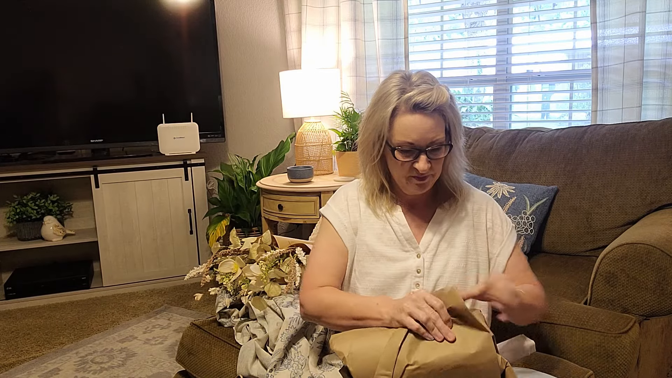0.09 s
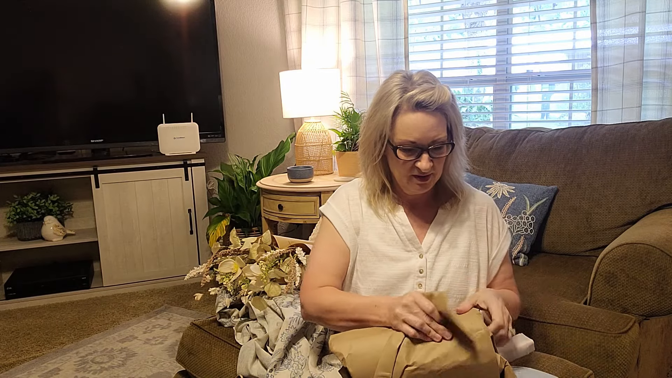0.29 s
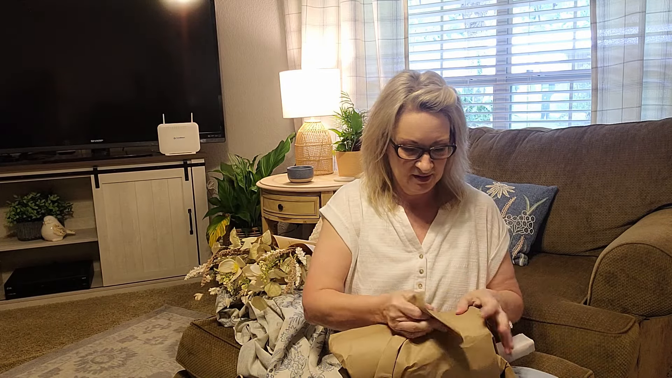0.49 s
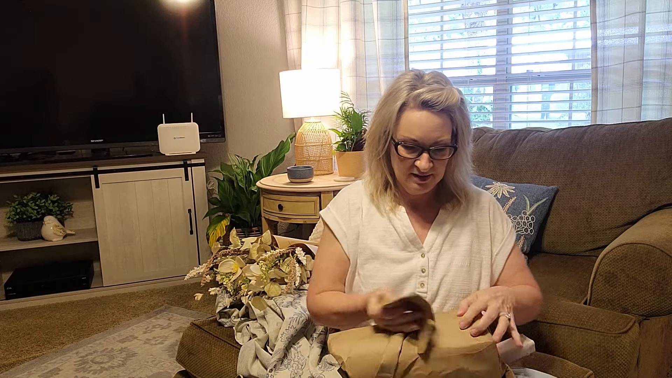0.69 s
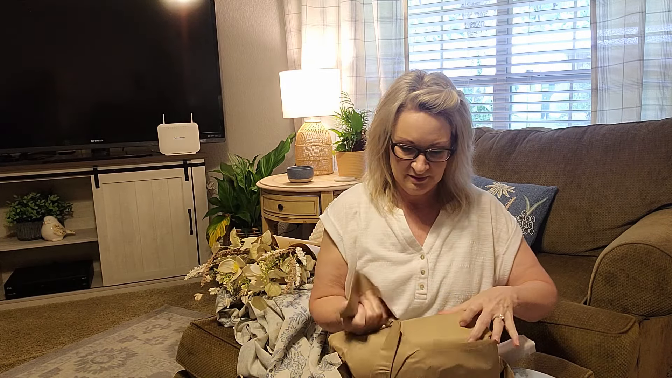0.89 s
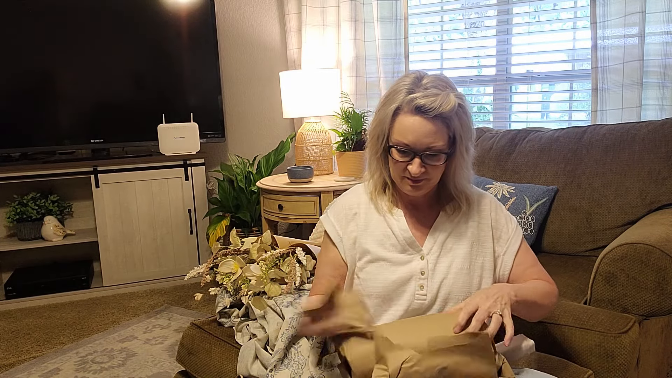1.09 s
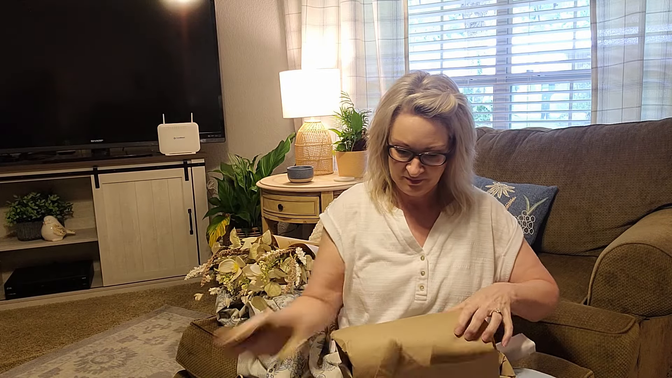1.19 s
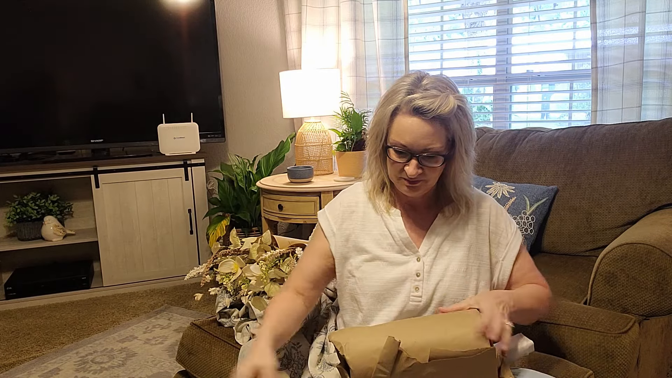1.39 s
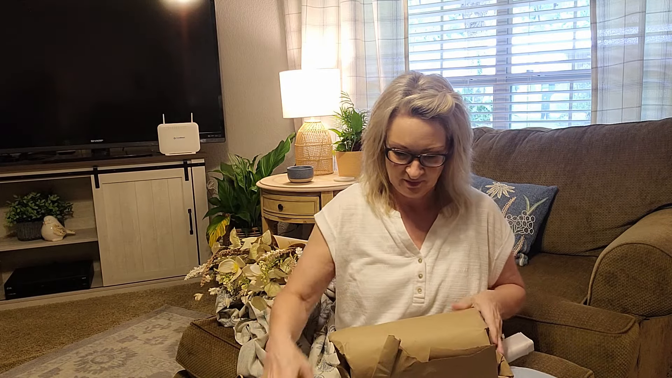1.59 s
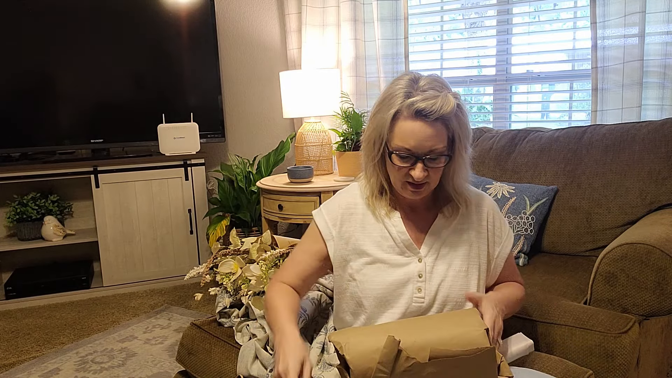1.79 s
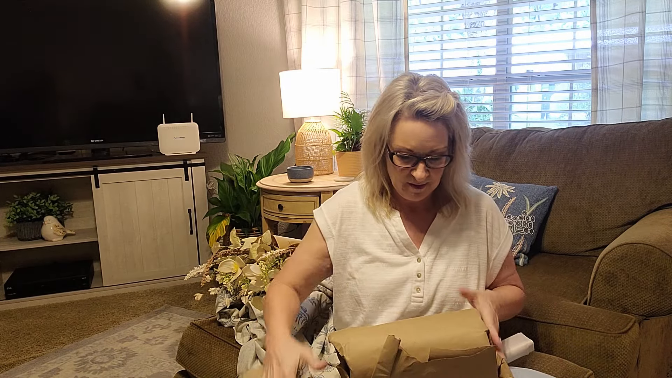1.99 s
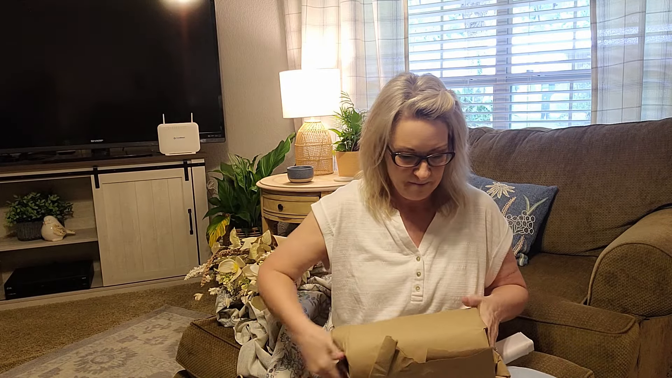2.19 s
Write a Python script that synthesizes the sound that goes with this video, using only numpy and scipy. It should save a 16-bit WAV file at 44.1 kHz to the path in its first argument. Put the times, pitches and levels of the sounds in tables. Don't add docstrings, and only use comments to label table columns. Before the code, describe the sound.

Stiff wrapping paper crinkles in quick hand strokes, with sharp crease snaps, bright ticks and soft hollow parcel thumps, then drops to faint settling rustles; close stereo microphone in a small, soft furnished living room.

```python
import sys
import numpy as np
from scipy import signal
from scipy.fft import rfft, irfft, next_fast_len
from scipy.io import wavfile
from scipy.ndimage import uniform_filter1d, map_coordinates

SR = 44100
rng = np.random.default_rng(int(sys.argv[2]) if len(sys.argv) > 2 else 0)


def bounce(signal):
    frames = np.transpose(np.atleast_2d(signal))
    limited = np.clip(frames, -1, 1)
    pcm = np.round(limited * 32767).astype(np.int16)
    wavfile.write(sys.argv[1], SR, pcm)


def rack_gain(trim_db):
    fader = np.asarray(trim_db, float)
    return 10 ** (fader / 20)


N = 97020

# (frequency [Hz], level [dB per Hz])
HUM_COLOUR = [(20, -19), (45, 2), (100, -5.5), (310, -10), (550, -11), (1200, -31), (7500, -23.5),
              (16000, -41.5)]
HUM_DB = -57.5
# (frequency [Hz], t60 [s])
ROOM_DECAY = [(200, 0.33), (2000, 0.29), (10000, 0.12)]
# (frequency [Hz], left-right likeness [0-1])
ROOM_ALIKE = [(100, 1), (700, 0.32), (3000, 0.069)]
# (frequency [Hz], left-right likeness [0-1])
NEAR_ALIKE = [(300, 0.85), (550, .02), (3000, .02)]
ROOM_DB, NEAR_DB, NEAR_T60_S = -11, -5, .025

# (time [s], peak [dB], pitch [Hz], t60 [s])
THUMPS = [(.022, -36.5, 475, 0.055), (0.102, -28.5, 440, 0.056), (0.21, -30.5, 346, 0.066),
          (0.276, -32.5, 317.3, 0.22), (0.275, -34, 163, 0.23), (0.304, -31, 280, 0.13),
          (0.441, -28, 263, 0.06), (0.593, -31, 273, 0.13), (.59, -37, 103, 0.12),
          (0.787, -38.5, 310, 0.07), (0.826, -28, 355, 0.053), (1.115, -50, 280, 0.18),
          (1.181, -25, 302, 0.052), (1.18, -35, 77, 0.15), (1.287, -40, 790, 0.07),
          (1.352, -45.5, 364, 0.13), (1.569, -47, 295, 0.17), (1.771, -42.5, 294, 0.074),
          (1.796, -47, 322, 0.07), (1.835, -26, 1080, 0.012), (1.906, -41, 316, 0.08),
          (2.015, -36.5, 346, 0.071), (2.018, -39.5, 820, 0.039), (2.067, -29.5, 336, 0.026),
          (2.073, -38, 157, 0.14), (2.086, -35.5, 169.4, 0.074), (2.072, -39.5, 92, 0.13),
          (.28, -43, 69, 0.12), (1.58, -49, 69, .15), (.99, -43, 150, 0.082), (.75, -37, 340, .05),
          (2.185, -15.5, 410, 0.019), (2.185, -17, 850, 0.02)]
THUMP_RISE_S, RATTLE_DB = 0.0045, 4

# (time [s], peak [dB], ring [Hz], crispness [dB])
SNAPS = [(0.104, -24.5, 1280, -11), (0.149, -30, 1160, -11.5), (0.182, -29.5, 1600, -3),
         (0.231, -14.5, 3760, -46), (0.266, -20.5, 1250, -21), (0.273, -18.5, 890, -21.5),
         (0.303, -19, 860, -21), (0.341, -16, 7100, -30), (0.376, -25, 1690, -15),
         (0.468, -24.5, 1407, -30), (0.564, -18, 7220, -30), (0.578, -15, 2320, -41),
         (0.591, -9.5, 2250, -25.5), (0.792, -30, 1070, -21), (0.821, -21, 1990, -19),
         (1.121, -17.5, 1220, -18), (1.185, -11, 1810, -29)]
# (time [s], peak [dB], ring [Hz], crispness [dB])
LATE_SNAPS = [
    (1.292, -38, 840, -28),
    (1.387, -34, 1250, -18),
    (1.523, -38, 980, -28),
    (1.614, -35, 3280, -26),
    (1.635, -39.5, 1215, -26),
    (1.787, -38, 1210, -10),
    (1.82, -37.5, 1060, -13),
    (2.023, -31, 830, -21),
    (2.066, -35, 970, -21),
]
SNAP_RISE_S, SNAP_T60_S, SLIP_DB = .0006, .02, 2.5
SNAP_Q, WIDE_DB = 3.3, -5.5
FIRST_SLIP = 4

# (time [s], peak [dB], ring [Hz], t60 [s])
TICKS = [(.0553, -34, 4870, 0.0089), (.1045, -26, 3200, .008), (.183, -18.5, 7070, 0.019),
         (.2014, -25.5, 5000, 0.011), (.2345, -17, 7500, 0.0082), (.3092, -21, 4900, 0.016),
         (.3292, -21, 4590, .01), (.4194, -34.5, 7520, 0.0069), (.4545, -30, 6500, .006),
         (.4625, -19, 7000, 0.0096), (.4688, -15.5, 6700, 0.0087), (.476, -26, 9000, 0.0091),
         (.5771, -11, 6490, 0.0082), (.6065, -8, 7130, 0.011), (.5295, -21, 7490, 0.0093),
         (.7243, -20, 4370, 0.017), (.9911, -33.5, 5500, .008), (1.0965, -21, 7200, .005),
         (1.0989, -10, 7460, 0.011), (1.292, -23, 3830, .012), (1.3872, -34.5, 7000, 0.019),
         (1.8238, -48, 5180, .01), (2.0218, -45, 4010, .02), (2.0657, -46, 3890, .015)]
# (time [s], peak [dB], ring [Hz], t60 [s])
POPS = [(.079, -32, 770, .03), (.197, -29.5, 1340, .015), (.262, -29.5, 1220, 0.045),
        (.283, -29, 980, 0.047), (.327, -31.5, 900, 0.016), (.35, -33, 696, .04), (.531, -24.5, 2810, .02),
        (.586, -17, 1740, 0.051), (.596, -18, 2250, 0.052), (.601, -18.5, 1480, 0.023),
        (.3755, -26, 3300, 0.01), (.827, -17.5, 2320, 0.01), (.861, -28, 1140, .02),
        (.8655, -13, 4600, .015), (.879, -25.5, 3270, 0.027), (.887, -26.5, 1270, 0.017),
        (.8895, -17, 3130, 0.024), (1.06, -29.5, 1190, 0.031), (1.1225, -17, 5200, .01),
        (1.132, -21.5, 1480, 0.042), (1.143, -15, 5000, 0.016), (1.157, -16.5, 2900, 0.09),
        (1.177, -16, 2900, 0.075), (1.391, -31, 2950, 0.013), (2.01, -43, 867, 0.024),
        (2.073, -41.5, 2400, .015)]
TICK_Q, TICK_EDGE_DB, POP_Q, POP_EDGE_DB, TICK_RISE_S = 2.5, -4, 3.5, -22, .0004

# (peak time [s], level [dB], swell [s], fade [s], crispness [dB])
STROKES = [(.03, -43.5, 0.3, 0.26, -4.5), (0.119, -39.5, 0.054, 0.054, -28), (0.238, -29, 0.048, 0.017, 1),
           (0.277, -37, 0.069, 0.059, 9.5), (0.349, -34.5, 0.18, 0.38, 2.5), (.42, -46, 0.055, 0.11, -7),
           (0.48, -30.5, 0.062, 0.017, 3), (0.531, -35.5, 0.0298, 0.021, 10),
           (0.598, -24.5, 0.062, 0.056, 8), (0.734, -36.5, 0.058, 0.062, 5.5),
           (0.798, -27.5, 0.028, 0.026, -5.5), (0.834, -30.5, 0.021, 0.085, 11),
           (0.886, -23.5, 0.14, 0.056, 0), (1.001, -36, 0.11, 0.028, -14), (1.072, -36, 0.12, 0.15, 1.5),
           (1.122, -31.5, 0.12, 0.042, 8), (1.157, -23.5, 0.12, 0.05, -7), (1.186, -22, 0.028, 0.045, -10),
           (1.143, -29.5, 0.045, 0.037, -1)]
# (peak time [s], level [dB], swell [s], fade [s], crispness [dB])
SETTLING = [(1.297, -49, 0.027, 0.067, 2), (1.39, -40.5, 0.067, 0.045, -4), (1.46, -65, 0.12, 0.11, -14),
            (1.602, -54, 0.18, .05, 5), (1.646, -46.5, 0.15, 0.021, -16), (1.8, -48.5, 0.043, 0.071, -28),
            (1.839, -57.5, 0.021, 0.17, 11), (1.91, -60, 0.13, 0.12, 5.5), (2.029, -43.5, 0.066, 0.1, -23),
            (2.1, -53.5, 0.072, 0.05, -0.5), (2.2, -44, 0.044, .05, -25)]
# (frequency [Hz], level [dB per Hz])
PAPER_COLOUR = [(60, -13), (300, 1), (600, -1.5), (1100, -2), (2400, -5.5), (3500, -1.5), (6000, -1.5),
                (16000, -17.5)]
CRACKS_PER_S, CRACK_CYCLES, CRACK_RING_S = 4500, 2, .00025
CRACK_SPREAD_DB, BIGGEST_DB = 4.3, 10
CLUMP_DB, PATCHY_DB, RUB_DB = 2.8, 2, -6
LOW_HZ, HIGH_HZ = 510, 4920
TAUT_HZ, TAUT_DB = 2360, -12

# (frequency [Hz], left over right [dB])
LEFT_DB = [(60, 0), (380, 1), (2380, 0.5), (5500, 5.5), (9500, 1.5)]
HANDS_LEAD_S = [.00013, .00007]
BEND_HZ = 2000
# (frequency [Hz], width [Hz], level [dB])
PORTS = [(632, 71, -6), (6180, 330, -5), (7230, 270, 5), (9210, 2040, -9.5), (12220, 2500, 3)]
LOW_CUT_HZ, TOP_HZ = 50, 15900


def unit(x):
    return x / np.sqrt(np.mean(x ** 2) + 1e-20)


def along(points, hz):
    f, v = np.transpose(points)
    return np.interp(np.log(hz + 1), np.log(f + 1), v)


def wobble(rate):
    return map_coordinates(rng.standard_normal(int(N * rate / SR) + 4), [np.arange(N) * rate / SR])


def wander(knots):
    return map_coordinates(rng.standard_normal(64), [knots])


def strike(t, rise_s, t60):
    return rack_gain(-60 * t / t60) * (1 - np.exp(-t / rise_s))


def filtered(x, response):
    n = x.shape[-1]
    m = next_fast_len(n + 4096)
    return irfft(rfft(x, m) * response(np.fft.rfftfreq(m, 1 / SR)), m)[..., :n]


def above(hz, edge_hz):
    u = 1j * hz / edge_hz
    return u * u / (1 + np.sqrt(2) * u + u * u)


def below(hz, edge_hz):
    u = 1j * hz / edge_hz
    return 1 / (1 + np.sqrt(2) * u + u * u)


def ringing(f, hz, sharpness):
    damping = 1j * f * hz / sharpness
    return damping / (hz * hz - f * f + damping)


def peaked(bands):
    return bands / np.abs(bands).max(axis=1, keepdims=True)


def spread(pair, alike):
    turn = lambda hz: np.arccos(np.clip(along(alike, hz), -1, 1)) / 2
    mid, side = filtered(pair, lambda hz: np.array([np.cos(turn(hz)), np.sin(turn(hz))]))
    return np.array([mid + side, mid - side])


def hum():
    noise = filtered(rng.standard_normal((2, N)), lambda f: rack_gain(along(HUM_COLOUR, f)))
    bed = unit(spread(noise, [(40, 0.88), (300, 0.76), (3000, 0.04)]))
    return rack_gain(HUM_DB + 0.62 * wobble(2.4)) * bed


def room(x):
    out, step = np.zeros((2, N + 2 * SR)), SR // 4
    for k in range(0, N, step):
        hz, t, z = signal.stft(rng.standard_normal((2, SR // 2)), SR, nperseg=256)
        fading = z * rack_gain(-60 * t / along(ROOM_DECAY, hz)[:, None])
        tail = spread(signal.istft(fading, SR, nperseg=256)[1], ROOM_ALIKE)
        wet = signal.fftconvolve(x[None, k:k + step], tail / np.linalg.norm(tail[0]), axes=1)
        start = k + 130
        out[:, start:start + wet.shape[1]] += wet
    return out[:, :N]


def nearby(x):
    t = np.arange(1024) / SR
    noise = rng.standard_normal((2, len(t))) * strike(t, 0.0055, NEAR_T60_S)
    tail = spread(noise, NEAR_ALIKE)
    return signal.fftconvolve(x[None], tail / np.linalg.norm(tail[0]), axes=1)[:, :N]


def parcel():
    out, t = np.zeros(N + SR), np.arange(SR // 4) / SR
    for s, db, hz, t60 in THUMPS:
        rattle_db = RATTLE_DB * wander(t * hz / 3 % 60)
        drift = 0.71 * wander(t * 110)
        tone = np.sin(2 * np.pi * hz * t + drift)
        out[round(s * SR):][:len(t)] += rack_gain(db + 1.5 + rattle_db) * strike(t, THUMP_RISE_S, t60) * tone
    return out[:N]


def ticks(rows, sharpness, edge_db):
    out, t = np.zeros(N + SR), np.arange(2048) / SR
    for s, db, hz, t60 in rows:
        noise = rng.standard_normal(len(t))
        noise[round(2 * TICK_RISE_S * SR)] = FIRST_SLIP
        burst = noise * strike(t, TICK_RISE_S, t60)
        bands = filtered(burst, lambda f: np.array([ringing(f, hz, sharpness), above(f, HIGH_HZ / 2)]))
        out[round(s * SR):][:len(t)] += rack_gain(db) * rack_gain([0, edge_db]) @ peaked(bands)
    return out[:N]


def snaps():
    out, t = np.zeros(N + SR), np.arange(2048) / SR
    for s, db, hz, crisp_db in SNAPS + LATE_SNAPS:
        slips = rng.standard_normal(len(t)) * rack_gain(SLIP_DB * wander(t * 550))
        slips[round(2 * SNAP_RISE_S * SR)] = FIRST_SLIP
        slips *= strike(t, SNAP_RISE_S, SNAP_T60_S)
        bands = filtered(slips, lambda f: np.array([
            ringing(f, hz, SNAP_Q),
            above(f, LOW_HZ) * below(f, 2 * HIGH_HZ) / (1 + 1j * f / HIGH_HZ),
            above(f, 2 * HIGH_HZ)]))
        out[round(s * SR):][:len(t)] += rack_gain(db) * rack_gain([-4, WIDE_DB, crisp_db + 4.0]) @ peaked(bands)
    return out[:N]


def effort():
    s, db, swell, fade, crisp_db = np.transpose(STROKES + SETTLING)[:, :, None]
    late = np.arange(N) / SR - s
    gain = rack_gain(db - 20 * np.where(late < 0, -late / swell, late / fade))
    body_gain = np.sqrt((gain ** 2).sum(0))
    edge_gain = np.sqrt(((gain * rack_gain(crisp_db)) ** 2).sum(0))
    return body_gain, edge_gain


def patchy(x):
    z = signal.stft(x, nperseg=256)[2]
    field = uniform_filter1d(rng.standard_normal(z.shape), 7, 0)
    field = uniform_filter1d(field, 6, 1)
    return signal.istft(z * rack_gain(PATCHY_DB * unit(field)), nperseg=256)[1][:N]


def crack_swarm():
    draw = rng.random((12000, 4))
    start = np.cumsum(-np.log(draw[:, 0])) * SR / CRACKS_PER_S
    draw, start = draw[start < N], start[start < N].astype(int)
    hz = 250 * 64 ** draw[:, 1:2]
    age = np.arange(256) / SR
    life = CRACK_CYCLES / (2 * hz) + CRACK_RING_S
    size_db = np.minimum(-CRACK_SPREAD_DB * np.log(draw[:, 2:3]), BIGGEST_DB)
    size = rack_gain(size_db) * np.sqrt(hz / life)
    envelope = (1 - np.exp(-4 * age / life)) * np.exp(-age / life) * np.hanning(512)[256:]
    cracks = size * np.sin(2 * np.pi * (hz * age + draw[:, 3:])) * envelope
    where = start[:, None] + np.arange(256)
    return np.bincount(where.ravel(), cracks.ravel(), N + 256)[:N]


def rustle(clump):
    swarm = rack_gain(0.28 * wobble(220)) * unit(crack_swarm())
    grain = clump * (swarm + rack_gain(RUB_DB) * rng.standard_normal(N))
    sound = unit(filtered(patchy(grain), lambda f: rack_gain(along(PAPER_COLOUR, f))))
    edge = filtered(sound, lambda f: 1 / (1 + (HIGH_HZ / (f + 1)) ** 2))
    taut = filtered(sound, lambda f: ringing(f, TAUT_HZ, 2))
    body_gain, edge_gain = effort()
    tension = rack_gain(TAUT_DB) * np.sqrt(body_gain / body_gain.max())
    return body_gain * (sound - edge + tension * taut) + edge_gain * edge


def at_ports(hand, lead_s):
    side = np.array([[.5], [-.5]])
    lead = lambda f: lead_s * f * f / (f * f + BEND_HZ ** 2)
    response = lambda f: rack_gain(side * along(LEFT_DB, f)) * np.exp(2j * np.pi * f * side * lead(f))
    return filtered(np.array([hand, hand]), response)


def scene():
    clump = rack_gain(CLUMP_DB * wobble(60.62))
    hands = [rack_gain(-2.5) * rustle(clump) + snaps() + parcel(),
             rack_gain(-3.5) * rustle(clump) + ticks(POPS, POP_Q, POP_EDGE_DB)]
    scattered = sum(rack_gain(NEAR_DB) * nearby(hand) for hand in hands)
    hands[0] = hands[0] + ticks(TICKS, TICK_Q, TICK_EDGE_DB)
    near = sum(at_ports(hand, lead_s) for hand, lead_s in zip(hands, HANDS_LEAD_S))
    return near + scattered + rack_gain(ROOM_DB) * room(sum(hands)) + hum()


def top_cut(x):
    return signal.sosfilt(signal.butter(12, 16670, fs=SR, output="sos"), x)


def record(dry):
    ports_db = lambda f: sum(db * np.exp(-((f - hz) / width) ** 2) for hz, width, db in PORTS)
    colour = lambda f: above(f, LOW_CUT_HZ) * (f < TOP_HZ) * rack_gain(ports_db(f))
    return top_cut(filtered(dry, colour))


dry = scene()
out = record(dry)
bounce(out)
```